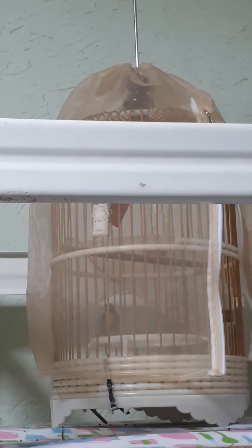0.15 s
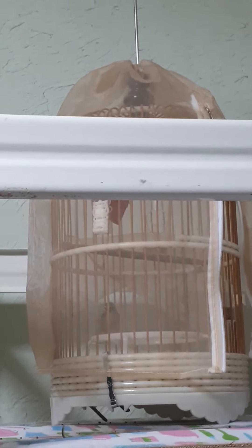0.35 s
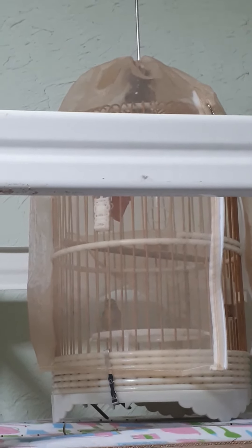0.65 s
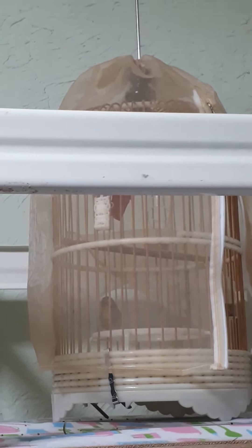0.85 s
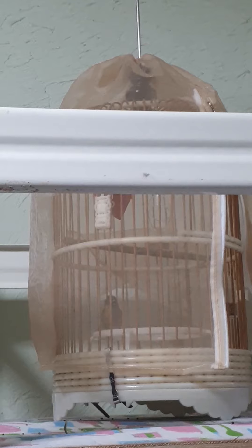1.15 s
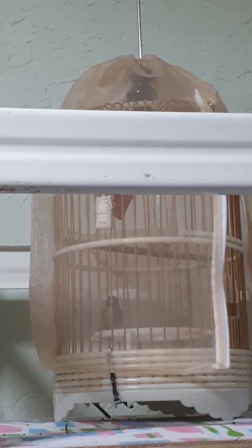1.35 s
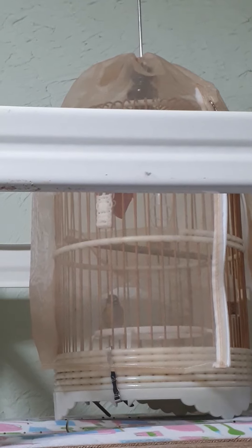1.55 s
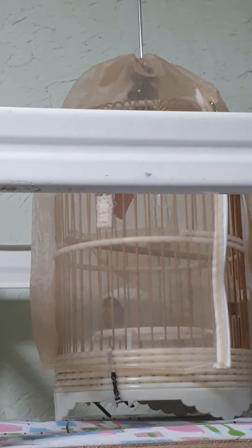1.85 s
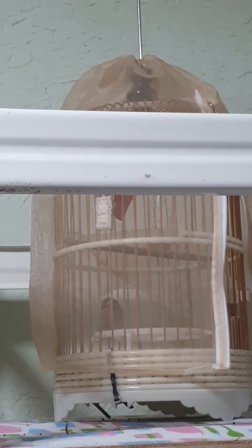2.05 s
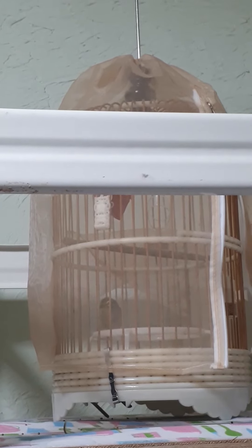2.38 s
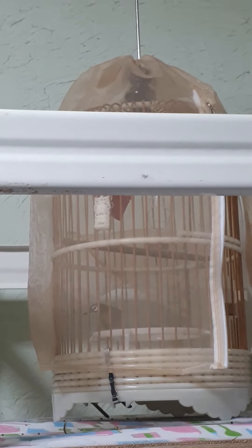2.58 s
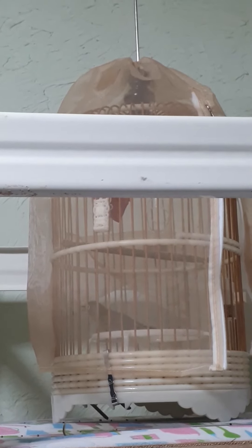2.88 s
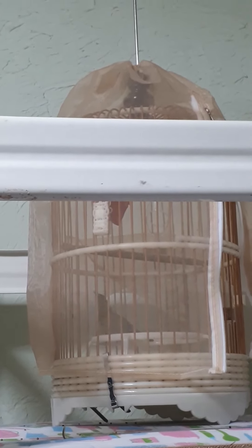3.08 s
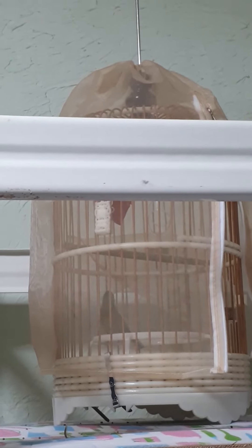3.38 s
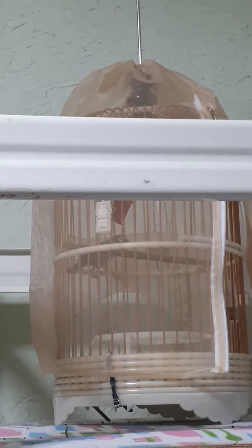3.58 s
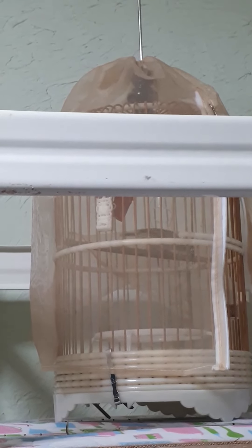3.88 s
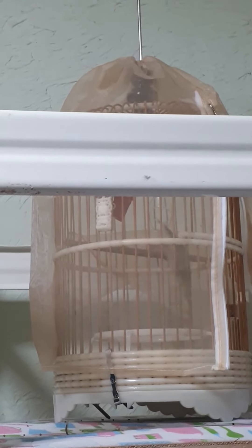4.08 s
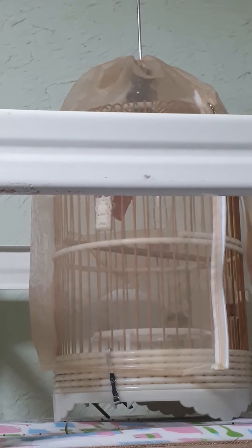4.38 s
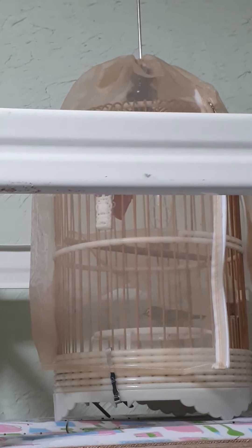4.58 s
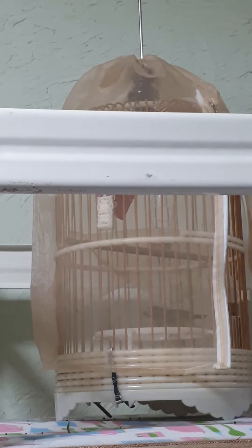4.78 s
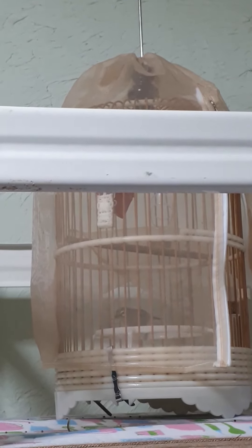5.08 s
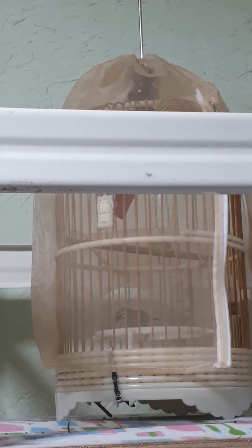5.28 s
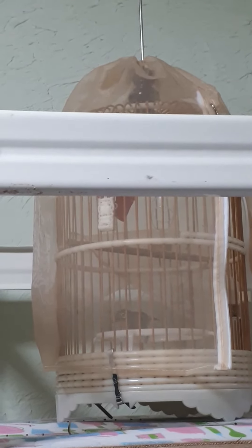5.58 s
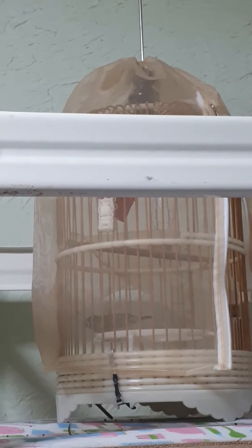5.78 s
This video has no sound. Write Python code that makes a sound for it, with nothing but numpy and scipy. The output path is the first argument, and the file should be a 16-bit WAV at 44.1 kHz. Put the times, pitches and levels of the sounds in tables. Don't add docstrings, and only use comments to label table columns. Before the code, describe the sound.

A small caged bird whistles bright, falling chirps in short phrases indoors, with a fainter bird answering over a low motor hum.

```python
import sys
import numpy as np
from scipy import signal
from scipy.fft import rfft, irfft
from scipy.io import wavfile
from scipy.ndimage import uniform_filter1d

SR = 44100
rng = np.random.default_rng(int(sys.argv[2]) if len(sys.argv) > 2 else 0)


def volts_from_db(level):
    exponent = np.asarray(level, float) / 20
    return 10 ** exponent


def digitize_waveform(pressure):
    field = np.atleast_2d(pressure).T
    bounded = np.clip(field, -1, 1)
    quanta = np.round(bounded * 32767).astype(np.int16)
    wavfile.write(sys.argv[1], SR, quanta)


N = 261954

# start_s [s], level_db [dB], beak_opening_db [dB]
THROAT_SNAPS = [(.356, -40, -3.5), (0.613, -42.5, -0.5), (0.772, -51.5, 5.5), (1.049, -41.5, 1),
                (1.252, -43, -1.3), (2.305, -52.5, -12.5), (2.815, -44, -2), (3.618, -50, -1.5),
                (3.879, -43, 19), (4.033, -52, -10), (4.143, -40.5, 3), (4.344, -42.5, 8.5),
                (4.52, -40, -2.2), (4.735, -45, 6.5), (5.262, -38.5, 8.5), (5.596, -42.5, -1),
                (5.849, -52, 4)]
PLUNGE_SHAPE = [(0, 1), (.11, .64), (.32, .36), (.52, .22), (.8, .09), (1, 0)]
PLUNGE_EFFORT = [-2, 1, -4.5, -5.5, -11.5, -11.5]
GLIDE_SHAPE = [(0, 1), (.5, .52), (1, 0)]
GLIDE_EFFORT = [-6, -1, -6.5]
DESCENT_SHAPE = [(0, .93), (.13, 1), (.33, .65), (.57, .46), (.86, .27), (1, 0)]
DESCENT_EFFORT = [-5.5, -1.5, -4, -6, -8.5, -17.5]


def colour(x, points):
    hz = np.maximum(np.fft.rfftfreq(x.shape[-1], 1 / SR), 1)
    at, db = np.transpose(points)
    gain = volts_from_db(np.interp(np.log(hz), np.log(at), db))
    return irfft(rfft(x) * gain, x.shape[-1])


def unit(x):
    return x / np.sqrt(np.mean(x ** 2))


def walk(rate_hz, size=N):
    width = int(SR / rate_hz)
    once = uniform_filter1d(rng.standard_normal(size), width)
    return unit(uniform_filter1d(once, width))


def notes_of(rows, shape, effort_db):
    share, height = np.transpose(shape)
    notes = []
    for start_s, length_s, top_hz, end_hz, level_db in rows:
        times = start_s + share * length_s
        pitches = end_hz + height * (top_hz - end_hz)
        notes.append(np.transpose([times, pitches, level_db + np.array(effort_db)]))
    return notes


def traced(notes, efforts_db):
    return [np.c_[note, db] for note, db in zip(notes, efforts_db)]


def caged_beak(s):
    return ([4] + [beak_db for at, _, beak_db in THROAT_SNAPS if at < s])[-1]


def whistle(notes, beak, wobble, flutter_db, rasp, settle_s, breath_db, overtone_db):
    # multiple [count], level_db [dB]
    overtones = [(2, -30.5), (3, -33.5)]
    # pitch_hz [Hz], level_db [dB]
    throat = [(4500, 7), (6500, -1.5), (8000, -7.5), (10500, -7), (13000, 0), (16000, 6)]
    # pitch_hz [Hz], level_db [dB]
    breath_tone = [(1500, -46), (2500, 1), (4500, 23.5), (7000, -0.5), (10000, -46), (13000, 3.5),
                   (16000, -3)]
    out, t = np.zeros(N), np.arange(N) / SR
    drift, flutter, rough = walk(191), walk(90), walk(595)
    breath = unit(colour(rng.standard_normal(N), breath_tone))
    rise_s, fall_s, settled = 0.004, 0.012, 0.25
    for note in notes:
        s, hz, db = np.transpose(note)
        beak_db = beak(s[0])
        on = slice(max(int((s[0] - rise_s) * SR), 0), min(int((s[-1] + fall_s) * SR), N))
        pitch = np.interp(t[on], s, hz) * (1 + wobble * drift[on])
        hoarse = rasp * (settled + np.exp((s[0] - t[on]) / settle_s)) * rough[on]
        phase = 2 * np.pi * np.cumsum(pitch) / SR + hoarse
        fade_in = np.clip((t[on] - s[0]) / rise_s + 1, 0, 1)
        fade_out = np.clip(1 - (t[on] - s[-1]) / fall_s, 0, 1)
        over = 0
        for k, over_db in overtones:
            gain_db = over_db + beak_db * 4 / k ** 2 + np.interp(k * pitch, *np.transpose(throat))
            over = over + volts_from_db(gain_db) * np.sin(k * (phase + 0.1 * rough[on]))
        tone = np.sqrt(2) * (np.sin(phase) + volts_from_db(overtone_db) * over)
        voice = tone + volts_from_db(breath_db + beak_db / 2) * breath[on]
        effort = volts_from_db(np.interp(t[on], s, db) + flutter_db * flutter[on])
        out[on] += voice * fade_in * fade_out * effort
    return out


def caged_song():
    hook_shape = [(0, .87), (.09, 1), (.24, .52), (.55, .37), (.82, .19), (1, 0)]
    arch_shape = [(0, .8), (.15, 1), (.3, .85), (.46, .58), (.69, .41), (.86, .21), (1, 0)]
    sweep_shape = [(0, .8), (.11, 1), (.3, .58), (.55, .29), (.85, .11), (1, 0)]
    hook_effort = [-7.5, -2.5, -1, -0.5, -6.5, -15.5]
    arch_effort = [-5.5, -2.5, -2.5, -6.5, -3, -7, -31.5]
    sweep_effort = [-2, -5.5, 1, -6, -0.5, -18]
    # start_s [s], length_s [s], top_hz [Hz], end_hz [Hz], level_db [dB]
    hooks = [
        (4.352, 0.11, 4800, 2887, -19.5),
        (4.748, 0.1, 4655, 2898, -16.5),
    ]
    arches = [
        (.372, 0.2, 5190, 3354, -13.5),
        (1.265, 0.17, 5362, 3210, -13),
        (2.822, 0.14, 5022, 3270, -18.5),
        (4.153, 0.098, 5727, 2940, -19.5),
    ]
    descents = [
        (1.068, .142, 4515, 2744, -13),
        (2.312, 0.23, 4723, 3165, -27.5),
        (4.043, .222, 4800, 2860, -27),
    ]
    sweeps = [
        (4.535, 0.12, 5565, 3385, -15.5),
    ]
    plunges = [
        (3.888, 0.14, 4400, 2984, -29.5),
        (5.86, 0.096, 4010, 3093, -19),
    ]
    strands = [
        (-.03, 0.086, 5270, 5170, -31),
        (2.315, 0.045, 5220, 5020, -32),
        (2.825, 0.055, 5180, 5130, -34.5),
        (3.63, .05, 5130, 5120, -43),
        (4.04, 0.045, 5240, 5200, -36),
        (5.29, 0.059, 5260, 5130, -35),
        (5.63, 0.087, 5240, 5150, -33.5),
    ]
    # time_s [s], pitch_hz [Hz]
    steps = [
        [(0, 4900), (.02, 4250), (.05, 4000), (.085, 3600), (.13, 3430), (.175, 3370), (.19, 3150)],
        [(.628, 4800), (.636, 5010), (.658, 5030), (.666, 4350), (.677, 3480), (.69, 3410), (.755, 3410)],
        [(3.627, 5000), (3.638, 4800), (3.648, 3950), (3.665, 3650), (3.69, 3900), (3.715, 4070), (3.738, 3750),
         (3.758, 3250)],
        [(5.284, 5150), (5.3, 5000), (5.315, 4550), (5.365, 4300), (5.39, 3650), (5.415, 3350), (5.44, 3050)],
        [(5.608, 4600), (5.622, 4950), (5.64, 4250), (5.658, 3720), (5.7, 3750), (5.72, 3550), (5.74, 3250)],
    ]
    # time_s [s], pitch_hz [Hz]
    climbs = [
        [(.781, 4400), (.79, 4950), (.808, 4950), (.818, 5500), (.83, 6050), (.842, 6500), (.86, 6250)],
        [(.8, 4600), (.82, 4500), (.845, 4750), (.858, 4500), (.87, 4050), (.92, 4120), (.945, 3750)],
        [(5.27, 4000), (5.28, 4250), (5.286, 4500)],
    ]
    steps_effort = [(-25, -19, -25, -18, -24, -24.5, -51), (-13.5, -18, -15.5, -15.5, -23.5, -15, -36.5),
                    (-36, -22, -24.5, -22, -28, -26, -41, -34.5), (-26, -15, -20, -17, -23.5, -26.5, -45.5),
                    (-26, -16.5, -10.5, -23.5, -18, -16, -40)]
    climbs_effort = [(-24, -17, -14, -15.5, -16.5, -34, -46), (-18, -28, -22, -17.5, -24.5, -19, -26.5),
                     (-41, -27.5, -24)]
    notes = notes_of(hooks, hook_shape, hook_effort) + notes_of(arches, arch_shape, arch_effort)
    notes += notes_of(descents, DESCENT_SHAPE, DESCENT_EFFORT)
    notes += notes_of(sweeps, sweep_shape, sweep_effort)
    notes += notes_of(plunges, PLUNGE_SHAPE, PLUNGE_EFFORT)
    notes += notes_of(strands, GLIDE_SHAPE, GLIDE_EFFORT)
    notes += traced(steps, steps_effort) + traced(climbs, climbs_effort)
    return whistle(notes, caged_beak, wobble=0.01, flutter_db=2.0, rasp=0.48, settle_s=0.019,
                   breath_db=-26, overtone_db=-1.0)


def second_voice():
    glides = [
        (-.03, 0.13, 3300, 2950, -51),
        (1.14, 0.069, 2660, 2568, -45),
        (4.378, 0.076, 2935, 2479, -38.5),
        (4.775, .07, 2860, 2418, -38.5),
    ]
    return whistle(notes_of(glides, GLIDE_SHAPE, GLIDE_EFFORT), caged_beak, wobble=0.015, flutter_db=3.5,
                   rasp=0.49, settle_s=0.048, breath_db=-22, overtone_db=9)


def hum():
    motor_tones = [(96.9, -54.5), (161.5, -55), (301.5, -52.5), (333.8, -60), (398.4, -60), (549.1, -58),
                   (597.5, -62.5), (748.3, -60.5), (1502, -61)]
    t = np.arange(N) / SR
    out = np.zeros(N)
    for hz, db in motor_tones:
        level = np.sqrt(2) * volts_from_db(db + 1.5 * walk(24))
        out += level * np.sin(2 * np.pi * hz * t + walk(6.1))
    return out


def air():
    # pitch_hz [Hz], level_db [dB per Hz]
    rumble = [(12, -45.5), (20, -40), (43, -8.5), (70, -10.5), (151, -1.5), (259, -6), (297, -7),
              (428, -8.5), (540, -10.5), (594, -11), (1280, -12), (2000, -20), (2600, -50), (4400, -120)]
    # [dB per Hz, same scale]
    hiss = [(1500, -12.5), (2500, -19), (3600, -17), (4600, -32), (5600, -28), (7000, -26.5), (8600, -26),
            (10000, -31), (12000, -38.5), (16000, -44)]
    # pitch_hz [Hz], side_minus_mid_db [dB]
    spread = [(30, -19), (125, -31.5), (250, -12), (1000, -8.5), (4000, -3.5), (15000, -8.5)]
    tone = [point for point in rumble if point[0] < hiss[0][0]] + hiss
    mid, side = colour(rng.standard_normal((2, N)), tone)
    side = colour(side, spread)
    return volts_from_db(-43.5) / np.sqrt(np.mean(mid ** 2)) * np.array([mid + side, mid - side])


def flock():
    swell = [(0, -55.5), (.9, -51), (1.5, -52), (1.9, -62), (2.4, -60), (3.0, -57), (3.6, -44),
             (4.0, -48.5), (4.4, -43.5), (5.1, -46), (5.5, -50.5), (5.94, -43.5)]
    # pitch_hz [Hz], level_db [dB]
    murmur_tone = [(1500, -34), (2100, -8.5), (2700, -2), (3600, -9), (4400, -1.5), (5500, -33)]
    shared, left, right = colour(rng.standard_normal((3, N)), murmur_tone)
    level = volts_from_db(np.interp(np.arange(N) / SR, *np.transpose(swell)) + 2.0 * walk(38))
    return level * unit(shared + 0.42 * np.array([left, right]))


def distant_answer():
    plunges = [
        (1.645, 0.06, 4825, 3050, -50),
        (2.615, .135, 4640, 3620, -45),
        (3.14, 0.13, 4930, 3280, -48),
        (3.41, .15, 4863, 2877, -50),
    ]
    descents = [
        (4.993, 0.091, 4820, 3380, -42.5),
    ]
    glides = [
        (.32, .045, 4854, 4280, -40),
        (2.02, 0.16, 4660, 4220, -65),
        (5.12, .08, 3760, 3540, -57),
        (5.215, 0.054, 4130, 4050, -53),
    ]
    # time_s [s], opening_db [dB]
    beak_moves = [
        (0, -18),
        (1.6, 24),
        (1.9, 0),
    ]
    notes = notes_of(plunges, PLUNGE_SHAPE, PLUNGE_EFFORT)
    notes += notes_of(descents, DESCENT_SHAPE, DESCENT_EFFORT)
    notes += notes_of(glides, GLIDE_SHAPE, GLIDE_EFFORT)

    def far_beak(s):
        return [db for at, db in beak_moves if at < s][-1]

    return whistle(notes, far_beak, wobble=0.014, flutter_db=1.0, rasp=0.84, settle_s=0.2,
                   breath_db=-20, overtone_db=2.0)


def snaps(length_s=0.011, from_hz=2300, to_hz=4900, late_s=0.0037):
    u = np.linspace(0, 1, int(length_s * SR))
    phase = 2 * np.pi * np.cumsum(from_hz * (to_hz / from_hz) ** u) / SR
    count = len(THROAT_SNAPS)
    hoarse = 0.25 * walk(1500, size=count * len(u)).reshape(count, -1)
    phases = phase + hoarse
    flicks = volts_from_db(-1) * np.sin(phases) + np.sin(2 * phases) + volts_from_db(-17) * np.sin(3 * phases)
    puffs = signal.lfilter([1, -1], [1], rng.standard_normal((count, len(u))))
    out = np.zeros(N)
    for (s, db, _), flick, puff in zip(THROAT_SNAPS, flicks, puffs):
        at = int((s + late_s) * SR)
        out[at:at + len(u)] += volts_from_db(db + 9.5) * np.sin(np.pi * u) * (flick + volts_from_db(-23) * puff)
    return out


def echoes(x):
    # delay_left_s [s], delay_right_s [s], level_db [dB]
    bounces = [
        (.002, 0.0024, -11),
        (.0054, 0.0056, -7),
        (.0093, 0.0074, -10),
        (0.0151, 0.015, -5.5),
        (0.0246, 0.032, -19.5),
    ]
    out = np.array([x, x])
    for *delays, db in bounces:
        for channel, delay in zip(out, delays):
            lag = int(delay * SR)
            channel[lag:] += volts_from_db(db) * x[:-lag]
    return out


def room(x, direct_db, wet_db, alike, rise_s, stretch):
    # pitch_hz [Hz], fade_s [s]
    fade_times = [(2000, 0.17), (4000, 0.4), (7000, 0.38), (15000, 0.19)]
    early_db, early_fade_s = 5, 0.062
    t = np.arange(int(0.9 * SR)) / SR
    shared, own = rng.standard_normal(len(t)), rng.standard_normal((2, len(t)))
    cloud = np.sqrt(alike) * shared + np.sqrt(1 - alike) * own
    hz = np.fft.rfftfreq(len(t), 1 / SR)
    at, fade_s = np.transpose(fade_times)
    tail = 0
    for k in range(len(at)):
        share = np.interp(hz, at, np.eye(len(at))[k])
        region = irfft(rfft(cloud) * share, len(t))
        tail = tail + region * volts_from_db(-60 * t / (fade_s[k] * stretch))
    tail = tail * (1 - np.exp(-t / rise_s)) * (1 + volts_from_db(early_db - 60 * t / early_fade_s))
    tail = tail / np.sqrt(np.sum(tail ** 2) / 2)
    wet = signal.fftconvolve(x[None], tail, axes=1)[:, :N]
    return volts_from_db(direct_db) * echoes(x) + volts_from_db(wet_db) * wet


def scene():
    caged = caged_song() + second_voice() + snaps()
    near = room(caged, direct_db=0, wet_db=2, alike=0.68, rise_s=0.0056, stretch=0.99)
    far = room(distant_answer(), direct_db=-24, wet_db=12.0, alike=0.6, rise_s=0.02, stretch=0.83)
    return near + far + hum() + air() + flock()


def low_pass(x):
    return signal.sosfilt(signal.butter(12, 15830, fs=SR, output="sos"), x)


def record(dry):
    # pitch_hz [Hz], level_db [dB]
    capsule_tone = [(20, -2), (9000, -0.5), (12000, 1), (15000, 3), (17000, 3)]
    # pitch_hz [Hz], level_db [dB]
    left_tone = [(500, 0.7), (1200, -2), (2500, -1), (5000, -0.17), (8500, 1.5), (13000, 0.7)]
    ceiling = 0.95
    top_edge = [(15800, 0), (15900, -40)]  # (Hz, dB) the phone drops everything higher
    bent = colour(dry + 0.003 * dry ** 2 - 0.071 * dry ** 3, capsule_tone)
    left, right = np.clip(bent, -ceiling, ceiling)
    mix = colour(np.array([colour(left, left_tone), right]), top_edge)
    return low_pass(mix)


dry = scene()
out = record(dry)
digitize_waveform(out)
```